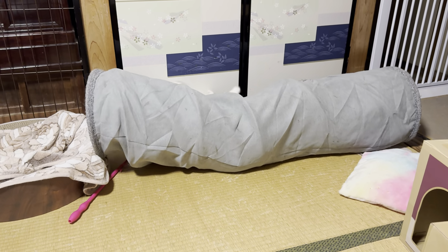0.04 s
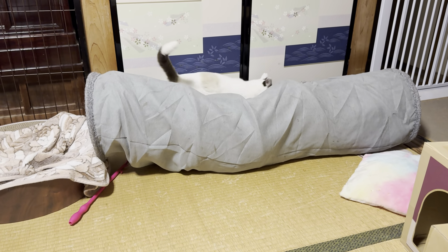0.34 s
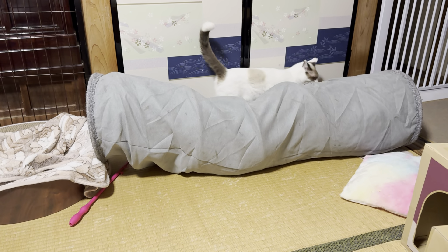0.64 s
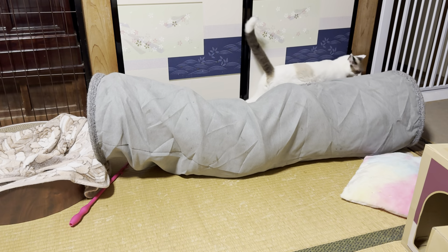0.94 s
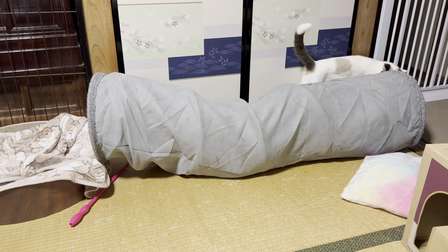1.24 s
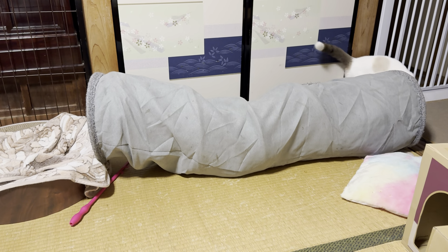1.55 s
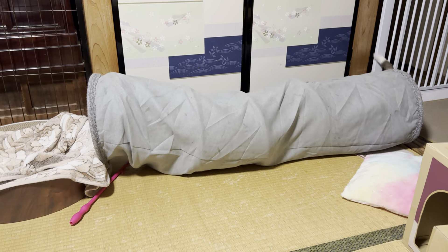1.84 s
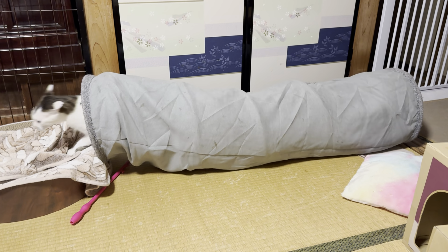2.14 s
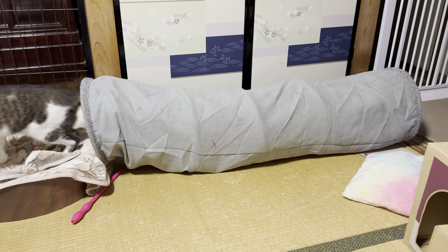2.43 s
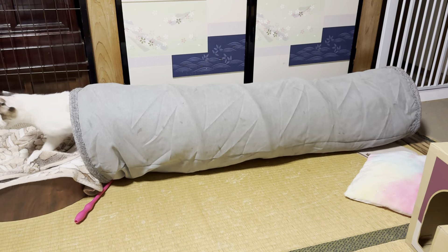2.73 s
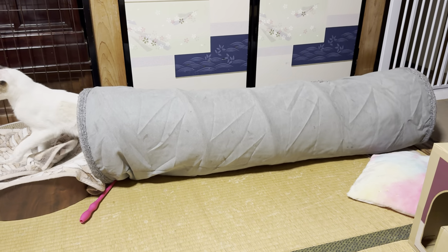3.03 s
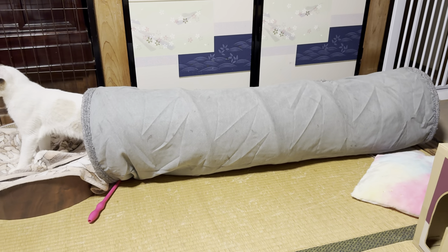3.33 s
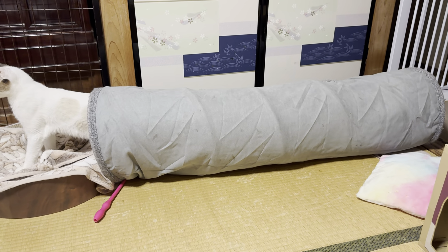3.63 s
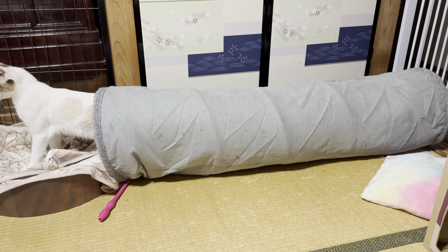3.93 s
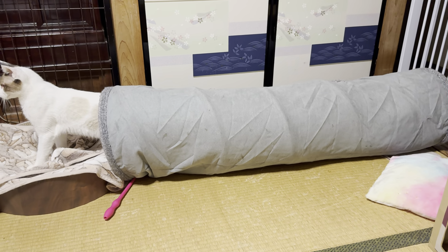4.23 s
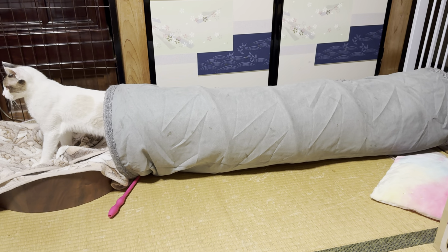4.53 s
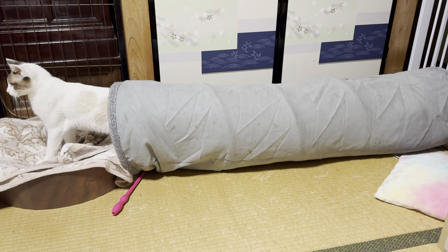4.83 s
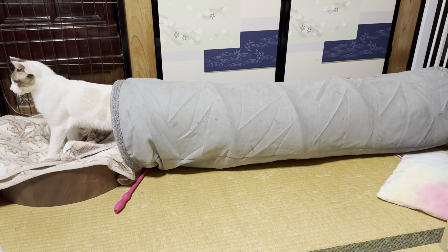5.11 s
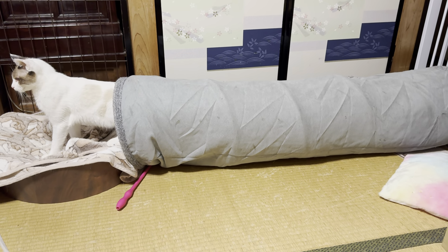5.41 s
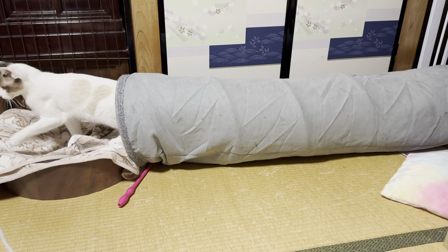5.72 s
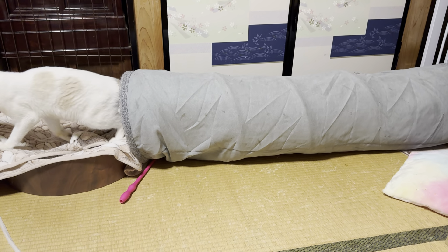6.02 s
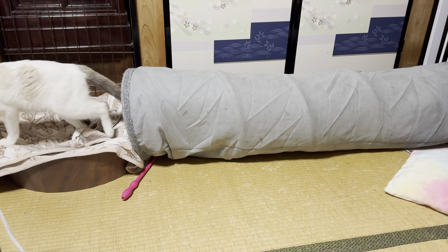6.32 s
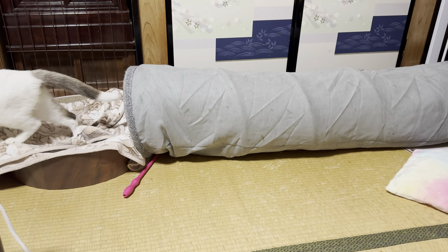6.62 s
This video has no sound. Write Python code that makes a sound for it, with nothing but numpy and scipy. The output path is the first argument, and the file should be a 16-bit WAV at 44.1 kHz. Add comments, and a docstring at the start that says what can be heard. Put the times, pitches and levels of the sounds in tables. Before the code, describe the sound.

In a small quiet room, left of the microphone, stiff fabric hisses and crackles as cats play in a tunnel. A short opening scuffle dies down, then builds into a loud scramble of flapping cloth and hollow paw thumps. Creases snap as the fabric settles. Later a cat shifts and steps out with softer crinkles, scattered ticks and light wooden taps, over faint low air noise.

```python
"""Cats play in a crinkly fabric tunnel on a matted floor in a small quiet room, left of the microphone.
First one cat clambers along the top: the stiff cloth hisses and crackles, and single creases snap.
From 1.5 s a chase runs through the tunnel: paws thump on the hollow floor and the walls flap taut.
From 2.7 s the tunnel springs back into shape, and a faint whine swells, then slowly fades.
From 4.5 s a cat shifts its weight in the tunnel's mouth and steps out, with light taps on wood."""
import sys
import numpy as np
from scipy import signal
from scipy.fft import rfft, irfft
from scipy.io import wavfile

SR = 44100
rng = np.random.default_rng(int(sys.argv[2]) if len(sys.argv) > 2 else 0)


def unload_audio(sound):
    """Save the sound as a 16-bit wav file, at the path given as the first command line argument."""
    columns = np.transpose(np.atleast_2d(sound))
    # keep every value between -1 and 1, then stretch to whole-number steps
    steps = np.round(np.clip(columns, -1, 1) * 32767)
    wavfile.write(sys.argv[1], SR, steps.astype(np.int16))


N = 333396
TIME, BINS = np.arange(N) / SR, np.fft.rfftfreq(N, 1 / SR)  # seconds, Hz

# A cat pushes or slides along the cloth. Each row: start, swell and hold in seconds, level in dB,
# extra dB for the lows (large slack folds), extra dB for the highs (tight wrinkles).
CLOTH_PUSHES = [ (-.01, .005, 0.062, -50, 4, 0.5), (0.087, 0.012, 0.018, -52.5, -2, -0.5),
                (.14, .012, 0.026, -52.5, -7, -1.5), (0.225, .012, 0.028, -56, 5.5, -1.5),
                (0.364, .015, .03, -70.5, 8, -1), (.55, .02, .02, -68.5, 11.5, -4),
                (.665, 0.0074, .015, -65.5, -2, -3.5), (0.765, 0.036, 0.2, -69, 7.5, -3.5),
                (1.25, .02, 0.084, -82, 14, -11), (1.39, .04, 0.078, -76.5, 10.5, 2),
                (1.524, 0.024, 0.023, -71, 7, 2), (1.58, 0.018, 0.093, -59, 11, 2),
                (1.678, .025, .015, -49, 6.5, -2.5), (1.753, .02, .03, -52.5, 10, 0.5),
                (1.797, .012, 0.018, -36, -1, 2.5), (1.828, 0.0094, 0.0067, -36.5, -6, 0),
                (1.902, .02, 0.011, -44, 4, -0.5), (1.95, .02, 0.077, -52, 6, 0),
                (2.06, .03, 0.069, -58, 6.5, 1.5), (2.125, 0.022, 0.054, -48, 11.5, 0),
                (2.19, .028, 0.009, -33, -12, 0), (2.236, 0.019, .015, -44, -3, 2),
                (2.352, .012, 0.038, -37, -3, 0), (2.44, .03, 0.068, -30, 0.5, -2),
                (2.595, .018, .025, -29, -3.5, -4), (2.655, .015, 0.023, -35.5, -3, -1),
                (2.72, .02, 0.06, -47, 3, -0.5), (2.81, .03, .08, -48, 1, -2),
                (2.977, 0.065, 0.11, -56, 1.5, -2.5), (3.16, .015, .04, -53, 0, -2.5),
                (3.23, .01, .025, -58, -1.5, 0.5), (3.313, .01, 0.03, -67, 7, 4),
                (3.428, 0.011, 0.027, -64.5, 9.5, 6.5), (3.55, .025, .035, -63.5, 6, 0),
                (3.7, .02, .015, -69, 6.5, -9), (4.525, .02, .12, -59.5, -1.5, -4),
                (4.675, .025, .07, -53, 2.5, -5), (4.803, .012, 0.022, -55, 0, -8),
                (4.945, .005, .01, -56, -2.5, -5), (5.728, .03, 0.036, -65, 7, 0),
                (5.839, 0.017, 0.048, -47.5, 0.5, -2.5), (5.98, .01, 0.017, -65, 7, -10),
                (6.054, .01, 0.021, -69, 5, -7), (6.371, 0.016, 0.056, -68.5, 9, 0),
                (6.515, .012, 0.0099, -66, 5, -5), (6.668, .008, .01, -68.5, 7.5, -8)]
# A resting cat brushes the cloth. The three values: low, middle and high level in dB.
RESTING_DB = [-82, -83, -89.5]


def pushing(release_db_per_s=262, settle_db=-25, settle_db_per_s=69):
    """The cloth's low, middle and high power: each push swells, holds, drops, then settles slowly."""
    t = TIME[::32]
    power = np.outer(gain_of(RESTING_DB) ** 2, np.ones(len(t)))
    for start, swell, hold, db, low_db, high_db in CLOTH_PUSHES:
        rise = np.clip((t - start) / swell, 0, 1)
        after = np.maximum(t - start - swell - hold, 0)
        fall = gain_of(-release_db_per_s * after) + gain_of(settle_db - settle_db_per_s * after)
        power += (gain_of([[db + low_db], [db], [db + high_db]]) * rise * fall) ** 2
    return np.array([np.interp(TIME, t, band) for band in power])


# The tone of the fabric. Each row: frequency in Hz, boost or cut in dB.
CLOTH_TONE = [(60, -14), (250, -6.5), (600, 0.5), (1000, -2), (1500, -1), (2200, -3), (3200, -1.5),
              (4700, 1), (7000, -2), (9000, -1), (12000, 1), (14200, -0.5), (16000, -2)]


def cloth(folds, creases, wrinkles, low_hz=2200, high_hz=7600):
    """Large folds give the fabric its lows, creases its middle and tight wrinkles its highs."""
    low, high = lows_below(low_hz), 1 - lows_below(high_hz, steepness=8)
    spectrum = rfft(folds) * low + rfft(creases) * (1 - low - high) + rfft(wrinkles) * high
    return colour(irfft(spectrum, N), curve(CLOTH_TONE))


def crackle(per_s, spread_db=2, kinds=24):
    """Tiny wrinkles buckle at random; each makes a short tick, and a few are large."""
    size = gain_of(spread_db * np.minimum(rng.exponential(1, N), 3.5))
    buckles = size * (rng.random(N) < per_s / SR)
    kind = rng.integers(0, kinds, N)
    ticks = sum(signal.oaconvolve(buckles * (kind == k), burst(.0001, .00066))[:N] for k in range(kinds))
    return unit_level(ticks / np.sqrt(per_s))


# The deep tone of the billowing tunnel wall. Each row: frequency in Hz, boost or cut in dB.
BILLOW_TONE = [(25, -21), (55, -4.5), (130, 0.5), (260, -1), (420, -6.5), (800, -24), (2000, -51)]


def rustle(power, crackle_db=-2, hiss_db=-9, billow_db=-56):
    """Harder pushing buckles more wrinkles a second; sliding cloth hisses and the wall billows."""
    low_db, middle_db, _ = 10 * np.log10(power)
    wrinkles_per_s = 1400 * gain_of(.35 * (middle_db + 43))
    crinkle = gain_of(crackle_db) * crackle(wrinkles_per_s) + gain_of(hiss_db) * rng.standard_normal(N)
    billow = unit_level(colour(rng.standard_normal(N), curve(BILLOW_TONE)))
    billow *= gain_of(billow_db + .65 * (low_db + 40.5))  # follows the large folds
    return cloth(*(np.sqrt(power) * crinkle)) + billow


def small_creases(power, largest_db=-45, spread_db=2, still_db=-70, tries=300):
    """Random rows for snaps(): small creases give way while the cloth moves, louder in a hard push."""
    at = rng.integers(0, N, tries)
    size, low, high = rng.standard_normal((tries, 3)).T
    push_db = 10 * np.log10(power[1, at])
    db = np.minimum(push_db, largest_db) + spread_db * size
    rows = np.transpose([at / SR, db, -6 + 3 * low, -1 + 3 * high])
    return rows[push_db > still_db]


# The largest creases snap through.
# Each row: start in seconds, level in dB, extra dB for the lows, extra dB for the highs.
BIG_CREASES = [(.0435, -49, 3, 4), (.1506, -45.5, -6, -1), (.1893, -42.5, -13, -4.5),
               (.3894, -59.5, 4, -11), (.529, -54.5, -3, -15), (1.0247, -61.5, -13, 8),
               (2.7428, -30, -21, -8), (2.8236, -48, -14, 4), (2.8368, -36, -22, -5), (3.0084, -54, -7, 0),
               (3.0483, -45, -5, -8), (3.0987, -51, -8, 3), (3.1229, -41, -9, -6), (3.1336, -57, 1, 4),
               (3.169, -51, 1, 5), (3.201, -39, -24, -14), (3.3174, -50.5, -21, -4), (3.3586, -57, 0, -1),
               (3.776, -67, -4, 0.5), (3.9521, -57.5, 1, -8.5), (4.0334, -64.5, -8, 0.5),
               (4.424, -72.5, -2, 6), (4.4596, -60, -9, -9.5), (4.5351, -53.5, 6, -1.5),
               (4.5674, -49, -10, -21), (4.6145, -45.5, -0.5, -2), (4.6927, -49.5, -4, 6.5),
               (4.6981, -41, -12, -2), (4.7468, -44, -5, -7), (4.7636, -49, -10, 5),
               (4.8003, -44.5, -6, -3), (4.8121, -41, -18, -3.5), (4.844, -48.5, 4.5, 4),
               (4.8961, -57, -6, -1), (4.9138, -54, 4.5, -2), (4.949, -42.5, -0.5, 2.5),
               (5.049, -55, -9, -9), (5.158, -64.5, -5, -10), (5.1861, -55.5, 3.5, -4),
               (5.7741, -51, -10, 4.5), (5.8445, -45, -2, 0), (5.8949, -45, 4, 2), (5.9249, -34.5, -31, -3),
               (5.9385, -49, 2, -9), (5.9861, -57, -12, -1), (6.0525, -50.5, -27, 3.5),
               (6.128, -59, -22, -2), (6.2795, -51.5, -1.5, 0.5), (6.376, -60.5, -12, 4.5),
               (6.3935, -42.5, -30, -17), (6.449, -53, -23, -13), (6.6526, -63.5, -11, 4),
               (6.6742, -51.5, -5, -0.5), (6.7598, -64, -4, 10), (6.949, -55, 3, -10),
               (7.4571, -66.5, -9, 11)]
# The tunnel wall is pulled taut with a flap. Each row: the same four values as for the creases.
WALL_FLAPS = [(1.807, -42, -2, 13), (1.913, -40.5, 7.5, 1.5), (2.220, -29, 2.5, -6.5),
              (2.361, -38.5, -7.5, 4), (2.431, -33.5, 0, 0.5), (2.608, -26.5, -0.5, -5)]


def snaps(rows, rise_s, fall_s):
    """A piece of cloth flips over with a puff of noise: a crease quickly, a whole panel more slowly."""
    bands = np.zeros((3, N))
    for start, db, low_db, high_db in rows:
        flip = burst(rise_s, fall_s) * np.sqrt(.005 * SR) * gain_of(db)
        for band, extra_db in zip(bands, (low_db, 0, high_db)):
            add(band, start, flip * gain_of(extra_db))
    return cloth(*bands)


# Paws and bodies land.
# Each row: start in seconds, boom level in dB, pitch shaken most in Hz, knock level in dB.
LANDINGS = [(.075, -38.5, 114, -41), (.098, -40.5, 65, -63), (.145, -42, 59, -70.5),
            (0.197, -51.5, 320.4, -56.5), (.335, -52, 91, -66), (.565, -51, 76, -60.5),
            (.583, -50.5, 81, -83), (.901, -52, 100, -65), (1.605, -50.5, 123, -68),
            (1.679, -49.5, 205, -46.5), (1.736, -49.5, 177, -68), (1.789, -43, 186, -48),
            (1.906, -50.5, 147, -48.5), (2.03, -48.5, 107, -63), (2.086, -44.5, 117, -51.5),
            (2.146, -42.5, 136, -47), (2.161, -36, 130, -40), (2.223, -38.5, 98, -36.5),
            (2.239, -45.5, 90.1, -48), (2.369, -37, 117, -42), (2.43, -36, 102, -59),
            (2.467, -43.5, 135, -51), (2.54, -33.5, 167, -45), (2.625, -48, 110, -47),
            (2.671, -48.5, 98, -59), (2.744, -50.5, 174, -53.5), (3.003, -55.5, 85, -57),
            (3.12, -59, 74, -68), (3.491, -58, 88, -68), (4.61, -80.5, 143, -54.5), (4.84, -78, 181, -60),
            (6.68, -66.5, 85, -70), (7.037, -66, 150, -69.5)]
# The notes of the floor under the mats. Each row: pitch in Hz, level in dB, seconds to fade by 60 dB.
FLOOR_NOTES = [(55.3, 2, 0.37), (66.4, -0.5, 0.2146), (82.1, -2, 0.2), (103.3, -5, .18), (130.1, -1.5, .22),
               (161.1, -2, 0.16), (186, -4, .19), (218.3, -8, 0.24), (245.4, 1.5, 0.22), (290.4, -1, 0.15),
               (344.5, -3, 0.09), (430, -3, 0.15), (509, -5.5, 0.13)]
# The hollow tone of a hard landing. Each row: frequency in Hz, boost or cut in dB.
KNOCK_TONE = [(150, -12), (340, 5), (480, 3), (640, 0), (900, -3), (1250, -6), (1800, -16.5), (3000, -20),
              (8000, -45.5)]


def thumps(rows, knock_trim_db=-1, width_octaves=.65, contact_s=.0034):
    """A paw rings the floor's notes nearest its own pitch; a hard landing adds a short knock."""
    hz, note_db, fade_s = np.transpose(FLOOR_NOTES)[:, :, None]
    t = np.arange(SR // 2) / SR
    directions = rng.choice([-1, 1], (len(rows), len(hz), 1))  # each spot starts each note up or down
    rings = gain_of(-60 * t / fade_s) * np.sin(2 * np.pi * hz * t) * (1 - np.exp(-t / contact_s))
    booms, knocks = np.zeros((2, N))
    for (start, db, blow_hz, knock_db), direction in zip(rows, directions):
        strength = direction * gain_of(note_db) / (1 + (np.log2(hz / blow_hz) / width_octaves) ** 2)
        boom = (strength * rings).sum(0)
        add(booms, start, gain_of(db) * np.sqrt(.056 * SR) * boom / np.linalg.norm(boom))
        knock = np.sqrt(.2 * SR) * burst(rise_s=.001, fall_s=.0073)
        add(knocks, start, gain_of(knock_db + knock_trim_db) * knock)
    return booms + colour(knocks, curve(KNOCK_TONE))


def soft_steps(db=-72, spread_db=2, paw_hz=260, count=14):
    """Random rows for thumps(): paws that fall too softly to knock."""
    start, size, octave = rng.uniform([0, -1, -1], [N / SR, 1, 1], (count, 3)).T
    no_knock = np.full(count, -np.inf)
    return np.transpose([start, db + spread_db * size, paw_hz * 2 ** octave, no_knock])


# Paws and the tunnel's rim tap on wood nearby. Each row: start in seconds, level in dB.
WOOD_TAPS = [(.079, -51.5), (1.679, -53.5), (2.146, -69), (4.949, -74), (5.186, -70), (6.279, -65.5),
             (6.392, -60.5), (6.673, -69)]
# The notes of the wood. Each row: pitch in Hz, level in dB, seconds to fade by 60 dB.
WOOD_NOTES = [(619.4, -7, 0.067), (825, -7, 0.045), (1010, -2, 0.11), (1090, -5.5, 0.12),
              (1198.5, -2, 0.057), (1345, -3, 0.049), (1475, 0, 0.056), (2900, -9.5, 0.033),
              (3187, -7, 0.024), (3542, -13.5, 0.026), (4600, -12, 0.027)]


def taps(contact_s=.00024):
    """A brief scuff rings all the wood's notes at once."""
    hz, note_db, fade_s = np.transpose(WOOD_NOTES)[:, :, None]
    t = np.arange(SR // 8) / SR
    out = np.zeros(N)
    for start, db in WOOD_TAPS:
        cycles = hz * t + rng.random(hz.shape)
        notes = gain_of(note_db - 60 * t / fade_s) * np.sin(2 * np.pi * cycles)
        ring = notes.sum(0) * (1 - np.exp(-t / contact_s))
        add(out, start, gain_of(db) * np.sqrt(.013 * SR) * ring / np.linalg.norm(ring))
    return out


# How long the room echoes. Each row: frequency in Hz, seconds to fade by 60 dB.
ECHO_FADES = [(100, 0.33), (500, .27), (1300, 0.44), (3500, 0.26), (9000, 0.13), (16000, 0.22)]
# The tone on the right side, compared with the left. Each row: frequency in Hz, boost or cut in dB.
RIGHT_TONE = [(60, 1.5), (150, -3.5), (330, -0.5), (600, -10.5), (1400, -5.5), (2600, -9.5), (4200, -6.5),
              (7000, -7.5)]


def room(sound, right_direct_db=-5, right_lag_radians=.71, gap_s=.0021, moves_per_s=5, spots=3):
    """Near walls send back dense echoes; the right side hears less of the tunnel."""
    shape = (spots, 2, SR // 2)
    bounces = rng.standard_normal(shape) * (rng.random(shape) < .15)
    hz, t, bands = signal.stft(bounces, SR, nperseg=256)
    fading = gain_of(-60 * t / curve(ECHO_FADES, hz)[:, None])
    tail = signal.istft(bands * fading, SR, nperseg=256)[1]
    tail *= np.clip(np.arange(tail.shape[2]) / SR / gap_s - 1, 0, 1)
    tail /= np.linalg.norm(tail, axis=2, keepdims=True)
    # the sounding spot wanders over the tunnel, and each spot has its own echoes
    wander = np.sqrt(2 / spots) * np.cos(np.pi * (moves_per_s * TIME + np.arange(spots)[:, None] / spots))
    echoes = signal.oaconvolve((sound * wander)[:, None], tail, axes=2).sum(0)[:, :N]
    echo_db = curve([(200, -14), (700, -5.5), (5000, -6)])
    echo_left, echo_right = rfft(colour(echoes, echo_db))
    bass = lows_below(320)  # long waves reach both sides alike
    echo_right = np.sqrt(bass) * echo_left + np.sqrt(1 - bass) * echo_right
    direct = rfft(sound)
    right = (direct * gain_of(right_direct_db * (1 - bass)) + echo_right) * gain_of(curve(RIGHT_TONE))
    return irfft(np.array([direct + echo_left, right * np.exp(-1j * right_lag_radians)]), N)


# The tone of the room's air noise. Each row: frequency in Hz, boost or cut in dB.
AIR_TONE = [(20, -22), (35, -9.5), (53, 1.5), (90, -9), (130, -8), (180, -9.5), (270, -9), (340, -15),
            (630, -25), (1000, -29), (2000, -35), (4000, -42.5), (8000, -46.5), (15500, -49)]
# How alike that noise is left and right. Each row: frequency in Hz, likeness (1 means the same).
AIR_LIKENESS = [(40, .6), (130, 0.52), (300, 0.77), (700, 0.46), (1500, .15), (6000, .1)]


def room_air(db=-67):
    """Low, steady air noise, more alike on both sides in the bass."""
    left, other = rfft(rng.standard_normal((2, N)))
    likeness = curve(AIR_LIKENESS)
    right = likeness * left + np.sqrt(1 - likeness ** 2) * other
    air = irfft(np.array([left, right]) * gain_of(curve(AIR_TONE)), N)
    return gain_of(db) * unit_level(air)


# The whine swells and slowly fades. Each row: time in seconds, level in dB.
WHINE_LEVELS = [(0, -106), (2.8, -100), (3.15, -79.5), (4.2, -87.5), (6.2, -93), (7.5, -102)]


def whine(hz=1505, width_hz=6, tone_db=-1.5, fuzz_db=-9):
    """A faint, thin tone with a fuzzy edge of noise."""
    narrow_band = 1 / (1 + ((BINS - hz) / width_hz) ** 2)
    fuzz = unit_level(irfft(rfft(rng.standard_normal(N)) * narrow_band, N))
    tone = np.sin(2 * np.pi * hz * TIME)
    swell = gain_of(np.interp(TIME, *np.transpose(WHINE_LEVELS)))
    return swell * (gain_of(tone_db) * tone + gain_of(fuzz_db) * fuzz)


def gain_of(db):
    """Turn decibels into a number to multiply by."""
    return 10 ** (np.asarray(db) / 20)


def unit_level(sound):
    """Scale a sound to an average power of 1."""
    return sound / np.sqrt(np.mean(sound ** 2) + 1e-20)


def curve(points, hz=BINS):
    """Join rows of (Hz, value) into a line, giving each octave about equal room."""
    point_hz, value = np.transpose(points)
    return np.interp(np.log(hz + 1), np.log(point_hz + 1), value)


def lows_below(hz, steepness=4):
    """Gains that keep the frequencies below hz and fade out those above."""
    return 1 / (1 + (BINS / hz) ** steepness)


def colour(sound, db):
    """Boost or cut each frequency by db, so that nothing rings ahead of a click."""
    cepstrum = irfft(np.log(gain_of(np.maximum(db, -100))), N)
    cepstrum[1:N // 2] *= 2  # move the ringing from before the click to after it
    cepstrum[N // 2 + 1:] = 0
    return irfft(rfft(sound) * np.exp(rfft(cepstrum)), N)


def add(mix, start_s, sound):
    """Mix a sound in at its start time."""
    part = mix[max(round(start_s * SR), 0):][:len(sound)]
    part += sound[:len(part)]


def burst(rise_s, fall_s):
    """A puff of noise of energy 1 that swells and dies away."""
    t = np.arange(int((rise_s + fall_s) * 8 * SR) + 8) / SR
    puff = rng.standard_normal(len(t)) * (1 - np.exp(-(t / rise_s) ** 2)) * np.exp(-t / fall_s)
    return puff / np.linalg.norm(puff)


def scene(low_cut_hz=38):
    """Cloth, floor and wood sound together in the room; the deepest bass does not reach the air."""
    power = pushing()
    creases = snaps([*BIG_CREASES, *small_creases(power)], rise_s=.00052, fall_s=.0019)
    flaps = snaps(WALL_FLAPS, rise_s=.0024, fall_s=.0064)
    cats = rustle(power) + creases + flaps + thumps([*LANDINGS, *soft_steps()]) + taps()
    low_cut = signal.butter(3, low_cut_hz, "high", fs=SR, output="sos")
    return room(signal.sosfilt(low_cut, cats)) + room_air() + whine()


def record(dry, treble_hz=7600, lead_s=1 / 3100, cancel_hz=9550, top_hz=15800):
    """In the treble the right side is a slightly early copy of the left; the very top is cut off."""
    left, right = rfft(dry)
    shared = np.clip((BINS - treble_hz) / 800 + .5, 0, 1)
    early_left = -left * np.exp(2j * np.pi * (BINS - cancel_hz) * lead_s)
    pair = irfft(np.array([left, (1 - shared) * right + shared * early_left]), N)
    top_cut = signal.firwin(511, top_hz, window=("kaiser", 9), fs=SR)
    return signal.oaconvolve(pair, top_cut[None], "same")


dry = scene()
out = record(dry)
unload_audio(out)
```